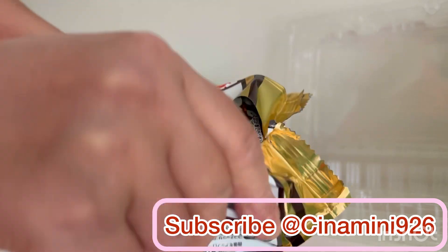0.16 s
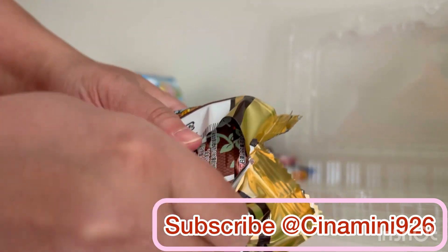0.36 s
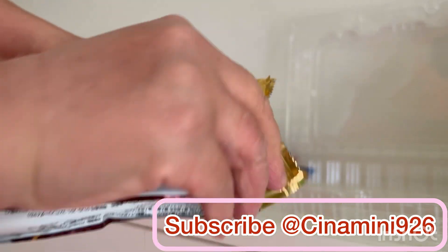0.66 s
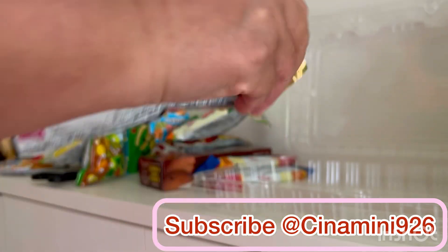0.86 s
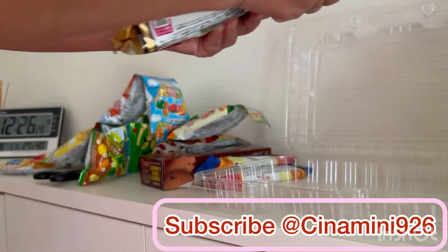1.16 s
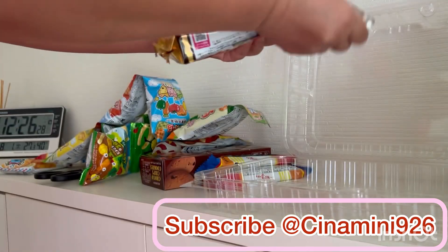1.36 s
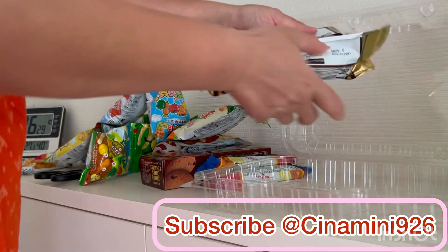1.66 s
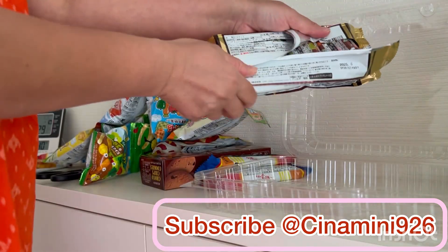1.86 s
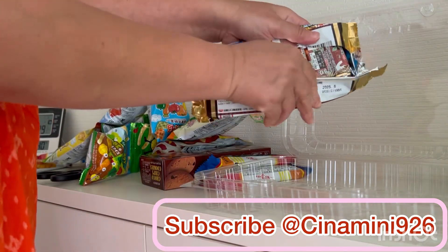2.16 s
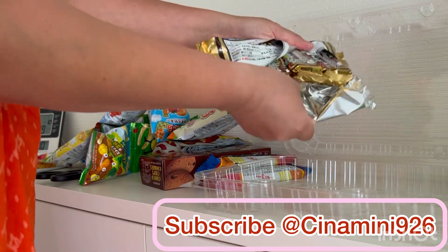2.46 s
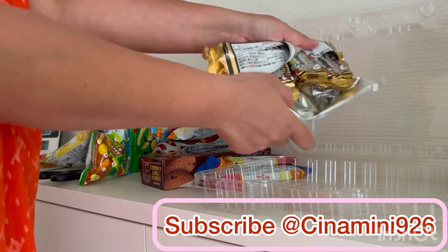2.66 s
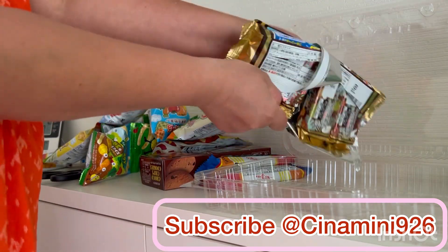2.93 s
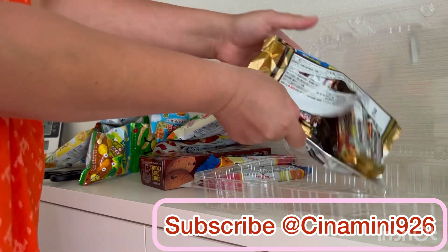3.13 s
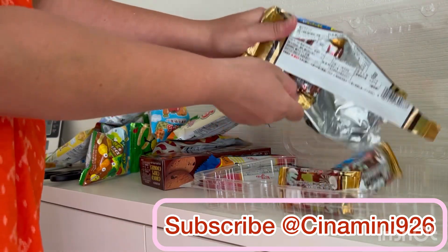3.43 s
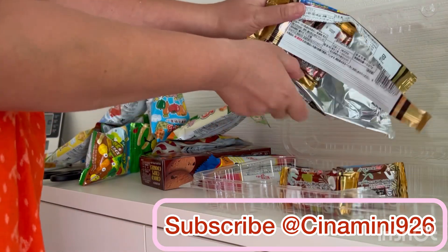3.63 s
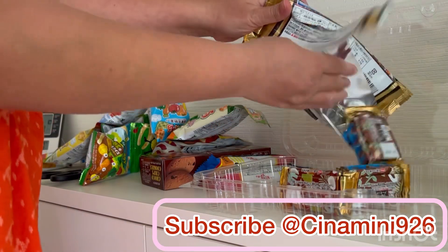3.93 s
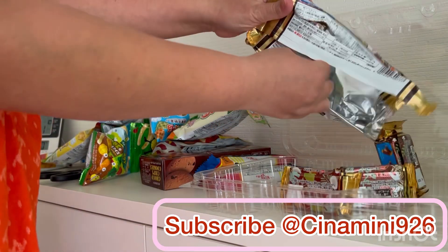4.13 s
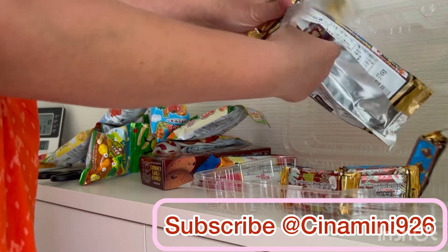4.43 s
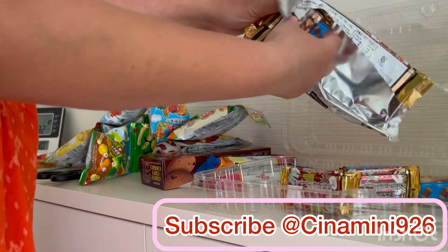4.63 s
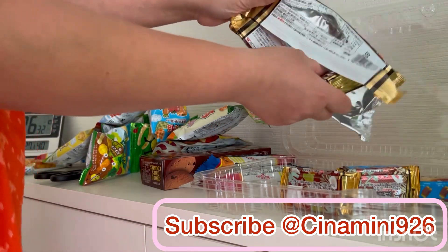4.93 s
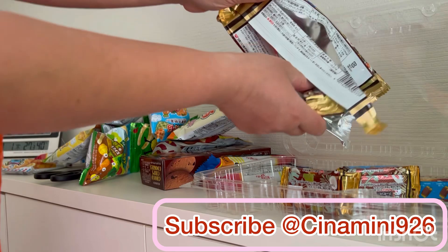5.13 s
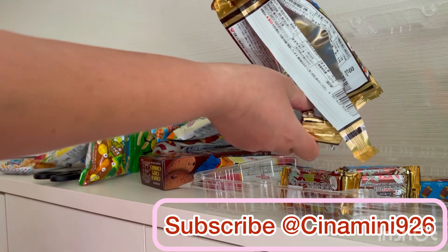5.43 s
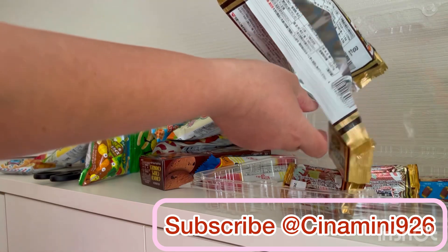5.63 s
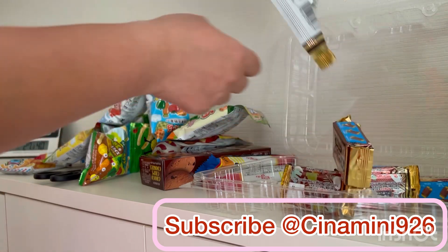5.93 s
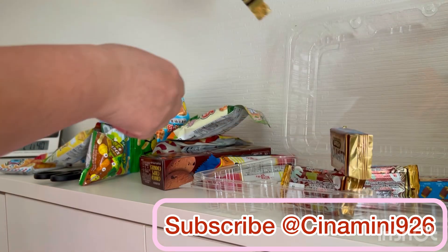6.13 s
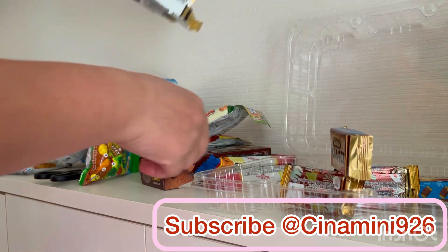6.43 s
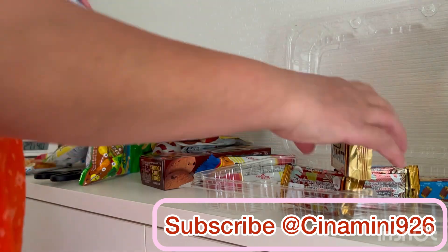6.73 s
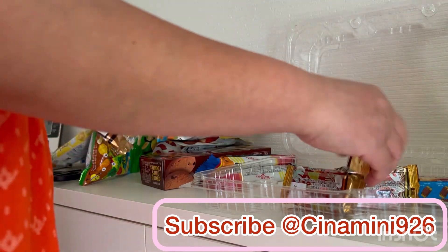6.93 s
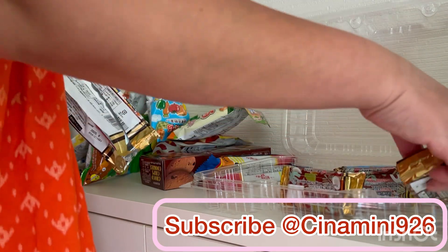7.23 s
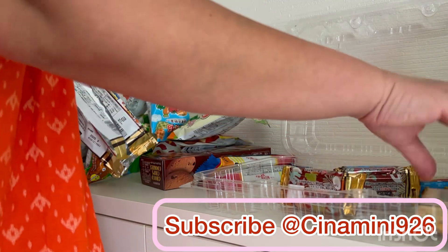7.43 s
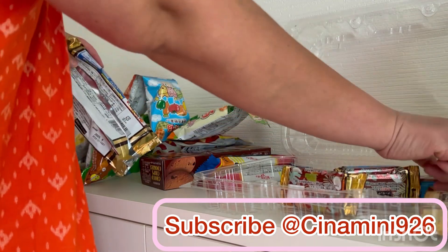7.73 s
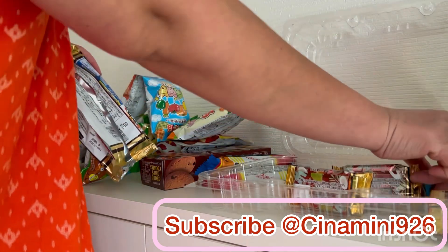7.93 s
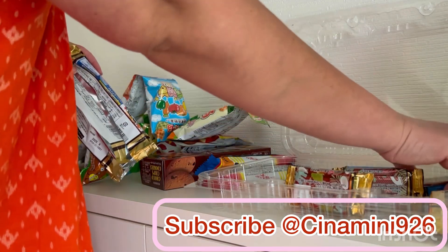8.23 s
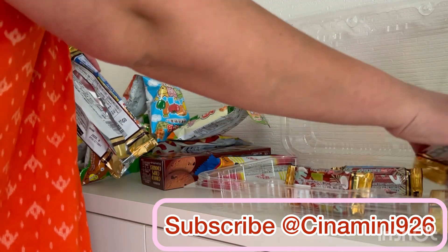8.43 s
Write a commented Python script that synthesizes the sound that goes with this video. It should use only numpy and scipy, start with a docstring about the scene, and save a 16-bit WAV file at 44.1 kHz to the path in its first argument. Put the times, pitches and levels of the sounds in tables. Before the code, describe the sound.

A small quiet kitchen, with a faint low hum and a little hiss throughout, heard by a close stereo microphone. From 0 s hands crumple a stiff foil snack bag: crisp, bright creases snap singly and in dense irregular swarms, with dull soft bumps of the packed bag near the start, 0.5 and 0.8 s. Strong crackle bursts continue through 1 to 3 s, especially around 2.3 s. From 3.2 to 3.5 s wrapped sweets tumble onto a thin plastic tray with short hollow knocks and rattles, the hardest near 3.5 s. More land around 4.1 and 4.6 s amid crinkling. After 4.7 s it thins to faint ticks, with a small drop at 5.6 s and duller crackles near 6.4 s. About 7.4 s a bump, knocks and rustles return, followed by lighter rattles near 7.8 and 8.2 s, and weak crackling to the end around 8.5 s.

```python
"""A quiet kitchen hums throughout, as shaped noise with a faint hiss. From the start hands crumple a foil
snack bag: film creases snap, alone and in swarms, as pops with a short random-sign jitter and a diffuse tail.
Bumps of the packed bag add dull puffs of low noise. After three seconds wrapped sweets land and rattle on
a thin plastic tray: noise-filled knocks excite its resonant modes. The creases and rattles thin out after
4.7 seconds, then return in a last flurry after 7.3 seconds. Two partly coherent ports receive it all."""
import sys
import numpy as np
from scipy import signal
from scipy.fft import rfft, irfft, next_fast_len
from scipy.io import wavfile

SR = 44100
rng = np.random.default_rng(int(sys.argv[2]) if len(sys.argv) > 2 else 0)


def wrap_up_sound(samples):
    """Save the sound to the file named by the first command line argument, as 16-bit audio."""
    columns = np.atleast_2d(samples).T
    # keep every value between -1 and 1, then stretch to whole-number steps
    tamed = np.clip(columns, -1, 1)
    steps = np.round(tamed * 32767).astype(np.int16)
    wavfile.write(sys.argv[1], SR, steps)


N = 378378

# spectrum of the kitchen hum: (frequency [Hz], relative density [dB])
ROOM_TONE = [(22, -35), (42, 2), (80, 1.5), (170, -1.5), (267, -6), (663, -15.5), (5000, -45.5),
             (6500, -64.5)]
ROOM_TONE_DB, HISS_DB = -51, -64.5   # rms ahead of the microphone

# hands squeeze or shift the film:
# (full grip time [s], hold [s], relative crackle level [dB], treble against middle [dB])
SQUEEZES = [(0.031, 0.32, -34.5, -4.5), (0.459, 0.054, -34.5, -2), (0.711, 0.095, -40, -24),
            (.81, 0.015, -29.5, 1.5), (0.958, 0.22, -44.5, 6), (1.121, 0.047, -28, -1),
            (1.32, 0.14, -33.5, 1.5), (1.58, 0.051, -33.5, 3.5), (1.83, 0.015, -35.5, -1),
            (2.1, 0.14, -45, -7), (2.26, 0.036, -31, -0.5), (2.34, 0.07, -32, 3), (2.515, 0.071, -33, -0.5),
            (2.64, 0.44, -36, 2), (3.2, 0.051, -30, 0), (3.35, 0.28, -37.5, -2), (3.73, 0.2, -33, -2.5),
            (4.049, 0.16, -36.5, 2), (4.302, 0.15, -34.5, 1), (4.56, 0.05, -33, 0),
            (4.719, 0.098, -41.5, -2), (4.998, 1, -59.5, 3.5), (5.582, 0.073, -40.5, -0.5),
            (6.1, 0.25, -47, -8), (6.4, 0.1, -44, -17), (6.86, 0.16, -47.5, -3), (7.38, 0.024, -36.5, 3),
            (7.799, 0.17, -43, 3), (8.13, 0.2, -39.5, -4.5)]
GRIP_DB_PER_S, LET_GO_DB_PER_S = 350.5, 108   # swell and decay of the middle and low crackle
TREBLE_HASTE = 1.53   # the treble swells and dies this much faster
# size of the small creases: (treble [dB], middle [dB], low [dB])
SWARM_DB = [-16.5, -18, -16.5]

# creases that snap loudly: (time [s], relative treble level [dB], middle level [dB], low level [dB])
SNAPS = [(0.0125, -26.5, -31, -31), (0.0354, -18.5, -23, -28.5), (0.046, -31, -24.5, -28),
         (0.0703, -29, -26, -29), (0.085, -16, -31, -34), (0.0932, -17.5, -23.5, -47),
         (0.1293, -15, -22.5, -23.5), (0.1444, -14.5, -23, -26), (0.1756, -13, -37, -33),
         (0.188, -11, -18.5, -48), (0.202, -17, -26.5, -32), (0.2264, -13.5, -26.5, -27.5),
         (0.2602, -22.5, -19, -55), (0.2885, -29, -33, -45), (0.311, -14.5, -33, -30),
         (0.366, -21, -31, -32), (0.373, -28.5, -56, -61), (0.426, -24, -28, -45),
         (0.459, -12.5, -18.5, -25), (0.4812, -11, -19.5, -22.5), (0.516, -23, -23.5, -28),
         (0.530, -10.5, -32.5, -51.5), (0.616, -16, -25, -28), (0.6762, -22.5, -28, -41),
         (0.7117, -29, -20, -16.5), (0.7305, -6.5, -21.5, -31.5), (0.8039, -14, -25, -34),
         (0.815, -8.5, -22.5, -37.5), (0.8269, -8, -17.5, -20.5), (0.8593, -15.5, -23.5, -49),
         (0.9765, -6, -33, -28.5), (1.0094, -14.5, -18, -25.5), (1.1351, -11.5, -20.5, -31),
         (1.1416, -12, -27.5, -30), (1.180, -13, -25.5, -47), (1.183, -20, -21.5, -28.5),
         (1.3298, -11.5, -31, -67), (1.399, -44, -30, -34.5), (1.6593, -14.5, -18.5, -29),
         (1.8496, -51, -31, -39.5), (1.9246, -24.5, -27, -63), (2.1077, -16, -23.5, -39.5),
         (2.155, -15, -22.5, -26), (2.2252, -10.5, -25, -61.5), (2.2463, -20, -21.5, -39.5),
         (2.2693, -5.5, -23, -24), (2.2991, -9.5, -13.5, -22.5), (2.4283, -7.5, -16.5, -30),
         (2.4953, -13.5, -25.5, -37.5), (2.5495, -25, -33, -37), (2.7533, -12.5, -36, -31),
         (2.771, -17, -35.5, -37), (2.819, -11, -28.5, -71), (2.9588, -10.5, -22.5, -35),
         (3.0096, -17.5, -31.5, -36), (3.3432, -15.5, -19, -16), (3.415, -13, -22, -48),
         (3.434, -13.5, -18.5, -26), (3.47, -9.5, -17.5, -18), (3.52, -17, -58.5, -49),
         (3.6453, -15, -46, -41), (3.778, -9.5, -21, -64), (4.089, -14.5, -19.5, -49),
         (4.3013, -11, -24.5, -40), (4.347, -15.5, -23.5, -21), (4.5585, -10.5, -17, -70),
         (4.7025, -16, -28.5, -38), (4.789, -35, -32, -60), (4.981, -35.5, -42, -55),
         (5.241, -28.5, -38.5, -54), (5.3141, -35.5, -32, -36.5), (5.527, -40, -44, -39),
         (5.5824, -20, -31.5, -31.5), (5.771, -38.5, -35.5, -55), (5.792, -32, -48, -38.5),
         (6.0203, -61, -51, -44), (6.118, -48, -32.5, -43), (6.2603, -59, -34, -45),
         (6.4134, -25.5, -24, -40), (6.4313, -49, -27, -33.5), (6.446, -45, -36.5, -50),
         (6.469, -30, -37, -57), (6.498, -58, -27, -56), (6.54, -30, -35, -84), (7.2842, -24, -39, -42),
         (7.3781, -23, -45, -69), (7.4083, -21, -21, -25.5), (7.451, -28, -21, -29),
         (7.687, -39, -45.5, -42), (8.079, -26.5, -36.5, -34.5), (8.1943, -30, -43, -44),
         (8.2646, -34, -34.5, -37), (8.282, -43.5, -39, -39.5), (8.4509, -29, -36.5, -38)]
FILM_BANDS_HZ = [(5500, 19000), (1300, 5500), (280, 1300)]   # treble, middle, low
# time constant of the jitter after a snap: (treble [ms], middle [ms], low [ms])
JITTER_MS = [1, 1.436, 1.11]
# clean pop against the jitter: (treble [dB], middle [dB], low [dB])
POP_DB = [2.5, 2.5, 16]
# diffuse kitchen tail against the click: (treble [dB], middle [dB], low [dB])
KITCHEN_DB = [-25, -21, -19]
KITCHEN_T60_S = 0.3
COLOUR_DB = 5.0   # spread of a crease's tint before its power is evened out
COUNTER_MS, COUNTER_DB = 4.8, -13   # echo off the counter top

# the hands bump the packed bag: (time [s], relative level [dB])
BUMPS = [(0.043, -33.5), (0.531, -37), (0.824, -34), (7.449, -29.5)]
BUMP_HZ, BUMP_MS = (70.4, 270), 15   # band and time constant

# sweets landing and sliding: (time [s], relative level [dB], rattle t60 [s], favoured pitch [Hz])
RATTLE = [(3.207, -26.5, 0.57, 600), (3.344, -18.5, 0.25, 597), (3.405, -21, 0.09, 480),
          (3.437, -15, 0.13, 650), (3.478, -8, 0.22, 480), (4.048, -20.5, 0.055, 647),
          (4.089, -18, 0.29, 550), (4.562, -23.5, 0.39, 505), (5.591, -24, 0.16, 417),
          (7.411, -20.5, 0.22, 630), (7.454, -17.5, 0.3, 345), (7.733, -34.5, 0.91, 600),
          (7.797, -28.5, 0.35, 700), (7.82, -26, 0.3, 396), (7.858, -34, 0.56, 430),
          (8.163, -28.5, 0.21, 504)]
OFF_PITCH_DB = 8.5   # loss of a mode one octave from the favoured pitch
# resonant modes of the tray: (frequency [Hz], relative level [dB], t60 [s])
TRAY = [(135, -1, 0.13), (423.5, -15, 0.15), (438.5, -24, 0.45), (560, -4, 0.045), (704, -6.5, 0.027),
        (800, -7, 0.042)]

# phase between the microphone ports: (frequency [Hz], lead of the left port [rad])
LEAD = [(30, 0), (600, -.3), (1800, .7), (2300, 0), (3050, -.8), (4400, -.5), (5100, -1.1), (5500, -3.9),
        (7250, -2.9), (7920, -1.5), (10100, .3), (10900, 1.2), (11900, 2.7), (14700, 5.5), (15600, 6.2)]
# kinship of the ports: (frequency [Hz], likeness [0-1], left minus right [dB])
PORTS = [(60, .96, -1), (350, .9, 0), (900, .72, -3.5), (1750, .4, -.5), (2700, .85, -1), (4100, .7, -3),
         (5150, .3, -1), (7000, .9, -1.4), (9500, .93, .1), (12700, .96, .4), (14400, .72, 0)]
# response of the microphone: (frequency [Hz], gain [dB])
MIC = [(900, -1), (2200, -0.5), (4800, -4.5), (13000, -5), (14200, -17.5), (15650, -8), (15950, -25),
       (16600, -40)]
CUTOFF_HZ = 16600


def amp(db):
    """Logarithmic level: decibels become an amplitude ratio."""
    return 10 ** (np.asarray(db) / 20)


def rms_one(x):
    """Normalisation: a signal is scaled to rms 1."""
    return x / np.sqrt(np.mean(x ** 2) + 1e-20)


def at_hz(points, hz, column=1):
    """Interpolation: a table is read on a log-frequency axis."""
    table = np.array(points)
    return np.interp(np.log(hz + 1), np.log(table[:, 0]), table[:, column])


def shaped(x, response):
    """Linear filtering: the spectrum is multiplied by a response given as a function of Hz."""
    size = next_fast_len(N + SR // 4)
    hz = np.arange(size // 2 + 1) * SR / size
    return irfft(rfft(x, size) * response(hz), size)[..., :N]


def band(x, low_hz, high_hz):
    """Band limitation: a Butterworth filter passes one range of frequencies."""
    return signal.sosfilt(signal.butter(2, [low_hz, high_hz], "band", fs=SR, output="sos"), x)


def dying(clicks, seconds):
    """Exponential decay: each click leaves a tail with this time constant."""
    return signal.lfilter([1], [1, -np.exp(-1 / (seconds * SR))], clicks + 1e-18)


def drift(rate_hz):
    """Low-passed noise: two equal poles give a slow random wander of spread 1."""
    step = 40   # samples between computed points
    r = np.exp(-2 * np.pi * rate_hz * step / SR)
    noise = rng.standard_normal(N // step + 2002)
    slow = signal.lfilter([1], [1, -2 * r, r * r], noise)[2000:]   # settled part
    return np.interp(np.arange(N) / step, np.arange(len(slow)), rms_one(slow))


def room_tone():
    """Stationary noise: unrelated rows of shaped hum and white hiss."""
    noise = rng.standard_normal((2, N))
    hum = rms_one(shaped(noise, lambda hz: amp(at_hz(ROOM_TONE, hz))))
    hiss = rng.standard_normal((2, N))
    return amp(ROOM_TONE_DB) * hum + amp(HISS_DB) * hiss


def squeezing(haste, with_treble):
    """Energy addition: every squeeze swells, holds and dies away, and their powers add to a gain."""
    t, power = np.arange(0, N / SR + .002, .002), 0
    for s, held, db, treble_db in SQUEEZES:
        before, after = np.maximum(s - t, 0), np.maximum(t - s - held, 0)
        loss_db = GRIP_DB_PER_S * before + LET_GO_DB_PER_S * after
        power = power + amp(db + with_treble * treble_db - haste * loss_db) ** 2
    return np.interp(np.arange(N) / SR, t, np.sqrt(power))


def swarm(base_per_s, spread_db, clump_db):
    """Random point process: clicks come in clumps, a few far larger than most if spread is given."""
    sizes = amp(spread_db * np.minimum(rng.exponential(1, N), 3.5))
    chance = base_per_s * amp(clump_db * drift(14)) / SR
    return sizes * (rng.random(N) < chance)


def crackle():
    """Partial correlation: creases common to all bands join others that crowd in with the grip."""
    middle = squeezing(1, False)
    gains = [squeezing(TREBLE_HASTE, True), middle, middle]
    shared = swarm(base_per_s=240, spread_db=4.5, clump_db=4.0)
    crowding = middle / amp(-36.5)
    bands = []
    for gain, db in zip(gains, SWARM_DB):
        own = swarm(base_per_s=700 * (0.23 + crowding), spread_db=3.5, clump_db=4.0)
        bands.append(gain * amp(db) * rms_one(shared + 0.5 * own))
    return bands


def burst(clicks, film_hz, jitter_ms, room_db, pop_db):
    """Impulse and decay: a click becomes a pop, a tinted dying jitter and a diffuse tail, in two rows."""
    out, edges = 0, np.geomspace(*film_hz, num=4)
    tints = amp(COLOUR_DB * np.clip(rng.standard_normal((3, N)), -2, 2))
    tints = tints / np.sqrt(np.mean(tints ** 2, axis=0))
    for low, high, tint in zip(edges, edges[1:], tints):
        tinted = clicks * tint
        pop = (amp(pop_db) * tinted) ** 2
        jitter = dying(tinted, jitter_ms / 1000) ** 2
        tail = amp(2 * room_db) * dying(tinted ** 2, KITCHEN_T60_S / np.log(1e6))
        signs = np.sign(rng.random((2, N)) - .5)
        out = out + band(np.sqrt(pop + jitter + tail) * signs, low, high)
    return out


def film_sound():
    """Superposition: loud snaps, each with one counter-top echo, stand among the swarms in three bands."""
    s, *snaps_db = np.transpose(SNAPS)
    at, lag, out = np.round(s * SR).astype(int), round(COUNTER_MS * SR / 1000), 0
    settings = zip(FILM_BANDS_HZ, JITTER_MS, KITCHEN_DB, POP_DB, snaps_db, crackle())
    for film_hz, jitter_ms, room_db, pop_db, db, small in settings:
        clicks = small.copy()
        peak = amp(db) * np.sqrt(SR / (film_hz[1] - film_hz[0]))   # a narrow band keeps less of a click
        clicks[at] += peak
        clicks[at + lag] += peak * amp(COUNTER_DB)
        out = out + burst(clicks, film_hz, jitter_ms, room_db, pop_db)
    return out


def bumps():
    """Damped impact: each bump is a dying puff of low noise."""
    s, db = np.transpose(BUMPS)
    clicks = np.zeros(N)
    clicks[np.round(s * SR).astype(int)] = amp(db) * np.sqrt(SR / BUMP_HZ[1])
    return band(dying(clicks, BUMP_MS / 1000) * rng.standard_normal((2, N)), *BUMP_HZ)


def tray():
    """Modal resonance: a firm knock and a dying rush of soft ones ring modes near the favoured pitch."""
    hzs = np.transpose(TRAY)[0]
    level = np.zeros((len(TRAY) + 2, N))   # the modes, then the dull clatter and the light rattle
    firm = np.zeros((len(TRAY), N))
    haste = np.append(np.ones(len(TRAY) + 1), 1.6)[:, None]   # the light rattle dies sooner
    for s, db, t60, favoured_hz in RATTLE:
        start = round(s * SR)
        t = np.arange(min(SR // 2, N - start)) / SR
        share = amp(-OFF_PITCH_DB * np.log2(hzs / favoured_hz) ** 2)
        light = amp(0.25 * (db + 19.5))   # soft landings have less light rattle
        decay = amp(db - 60 * haste * t / np.clip(t60, .03, .8))
        onset = 1 - np.exp(-t / 0.0011)
        level[:, start:start + len(t)] += np.append(share, [1, light])[:, None] * decay * onset
        firm[:, start] = share * amp(db + 19.0)
    knocks = level * rms_one(swarm(base_per_s=3000, spread_db=0.0, clump_db=2.5))
    rush = rng.standard_normal((2, N))
    clatter = band(band(knocks[-2] * rush, 180, 830), 99, 1350)
    rattle = band(knocks[-1] * rush, 1210, 2400)
    out = amp(6.0) * clatter + amp(3.0) * rattle
    for (hz, db, t60), soft, hard in zip(TRAY, knocks, firm):
        r = amp(-60 / (np.clip(t60, .03, .4) * SR))   # pole radius
        w = 2 * np.pi * hz / SR
        noise = rng.standard_normal((2, N))
        push = soft * noise + hard * np.sign(noise) + 1e-18
        ring = signal.lfilter([0, np.sin(w)], [1, -2 * r * np.cos(w), r * r], push)
        out += amp(db - 24.0) * ring
    return out


def scene():
    """Superposition: row 0 will reach both ports alike, row 1 is the unrelated part that parts them."""
    return room_tone() + film_sound() + bumps() + tray()


def record(dry):
    """Partial coherence: two ports differ in phase, balance and likeness; peaks round and the top is cut."""
    def likeness(hz):
        return np.clip(at_hz(PORTS, hz), 0, 1)

    def port(side):
        def response(hz):
            gain_db = at_hz(MIC, hz) + side * at_hz(PORTS, hz, column=2) / 2
            return amp(gain_db) * np.exp(.5j * side * at_hz(LEAD, hz))
        return response

    common = shaped(dry[0], lambda hz: np.sqrt((1 + likeness(hz)) / 2))
    apart = shaped(dry[1], lambda hz: np.sqrt((1 - likeness(hz)) / 2))
    pair = np.array([shaped(common + apart, port(1)), shaped(common - apart, port(-1))])
    pair = .9 * np.tanh(pair / .9)   # the loudest snaps are rounded
    return signal.sosfilt(signal.ellip(10, .5, 70, CUTOFF_HZ, fs=SR, output="sos"), pair)


dry = scene()
out = record(dry)
wrap_up_sound(out)
```